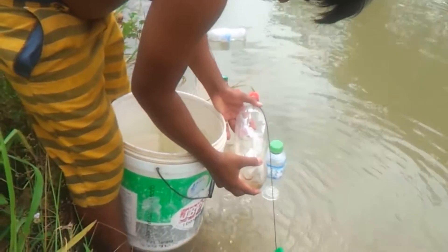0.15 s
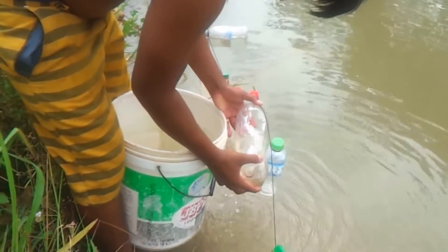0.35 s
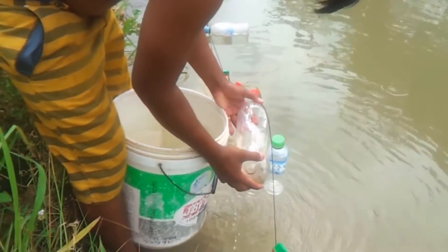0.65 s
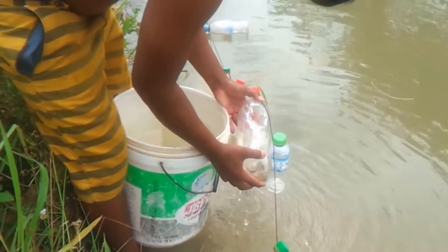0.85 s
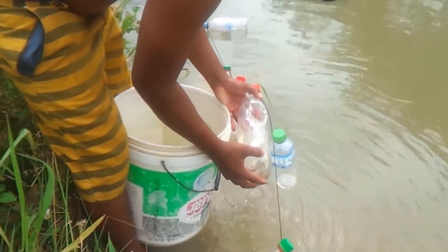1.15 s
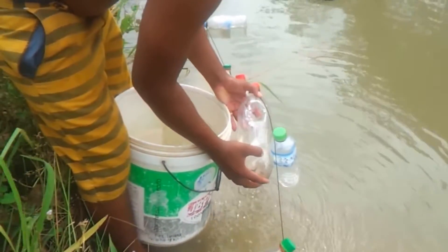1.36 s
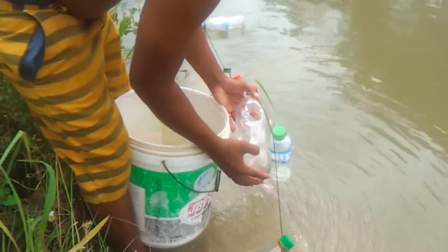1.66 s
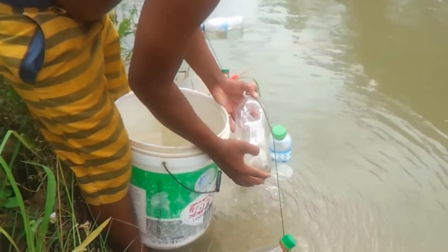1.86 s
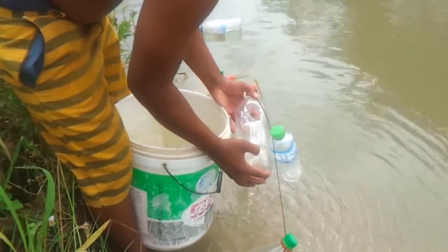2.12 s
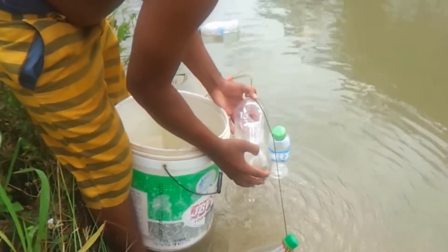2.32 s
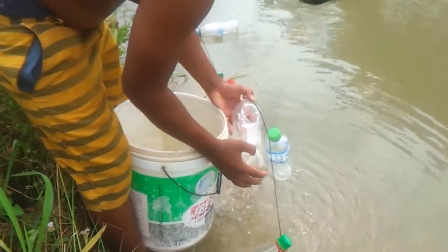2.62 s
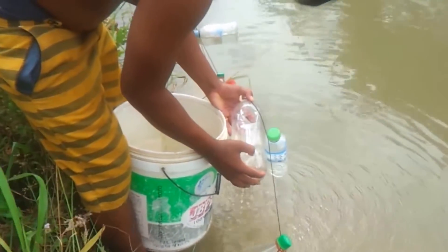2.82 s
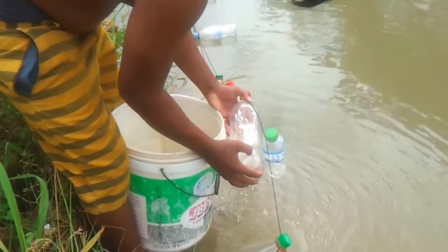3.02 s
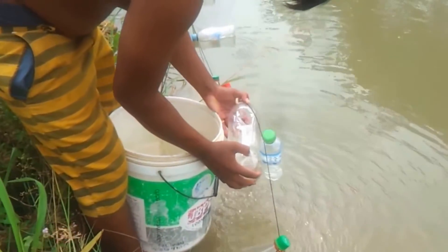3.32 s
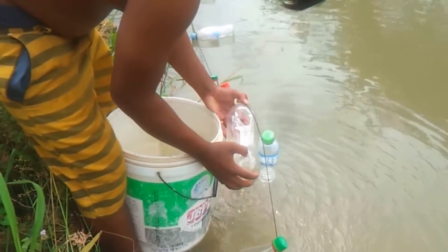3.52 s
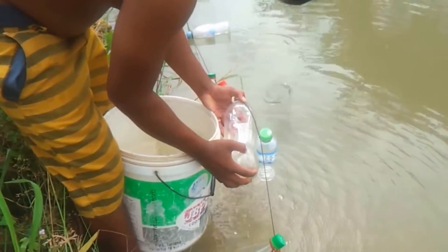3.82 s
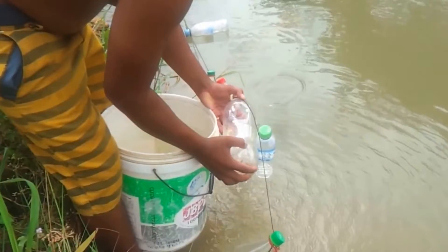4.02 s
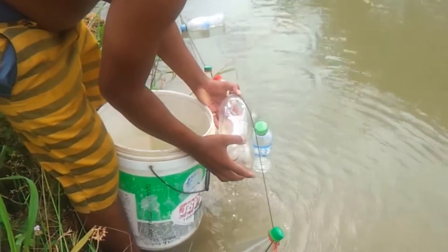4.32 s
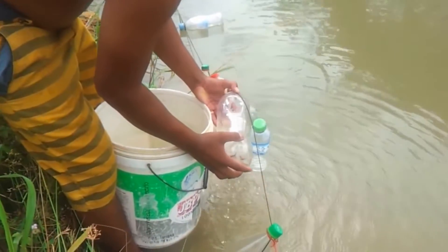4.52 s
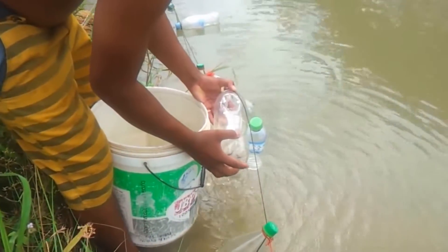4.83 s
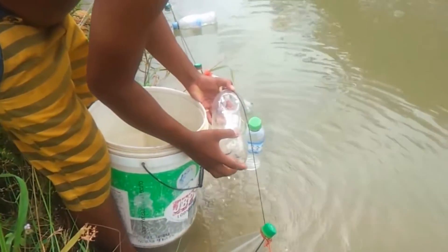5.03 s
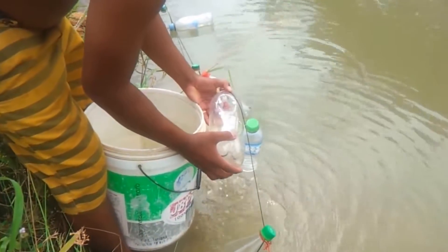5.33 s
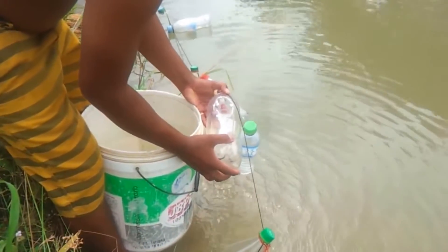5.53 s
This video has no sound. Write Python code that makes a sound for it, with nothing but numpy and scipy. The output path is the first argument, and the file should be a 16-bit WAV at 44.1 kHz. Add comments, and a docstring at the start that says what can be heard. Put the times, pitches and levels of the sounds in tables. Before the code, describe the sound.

A steady small gurgle of rising bubbles with light spray and scattered ringing drops, heard dry and near. Soft hollow plastic knocks come at about one second, more taps and rubs follow, then a bright pop of the bottle wall near 2.45 seconds. Low breeze buffets the microphone until just after three seconds, leaving quieter bubbling.

```python
"""Water trickles, gurgling and hissing, out of a plastic bottle trap held beside a bucket at a pond's edge.
The gurgle is trapped air: damped sines that climb in pitch as bubbles rise, a crowd with large ones on top.
The spray is filtered noise, a fizz of tiny splashes and single droplets ringing on the surface.
Fingers knock (damped modes), rub (filtered slips) and snap (wall modes, a short hiss) the thin plastic.
Behind them a breeze rumbles on the microphone: low noise and random thuds under slow level curves."""
import sys
import numpy as np
from scipy import signal
from scipy.io import wavfile
from scipy.ndimage import uniform_filter1d

SR = 44100
rng = np.random.default_rng(int(sys.argv[2]) if len(sys.argv) > 2 else 0)


def wav_out(sig):
    """Save sig, one row per channel (or a flat mono array), as 16-bit PCM at SR to the path in sys.argv[1]."""
    wavfile.write(sys.argv[1], SR, np.round(np.clip(np.atleast_2d(sig).T, -1, 1) * 32767).astype(np.int16))


N = 250047  # samples


def gain_of(db):
    """Logarithmic level: decibels become an amplitude factor."""
    return 10 ** (np.asarray(db) / 20)


def evened(x):
    """Normalisation: scales a signal to rms 1."""
    return x / np.sqrt(np.mean(x ** 2) + 1e-20)


def read(points, hz):
    """Spectral envelope: interpolates levels in dB along a log-frequency axis."""
    point_hz, level_db = np.transpose(points)
    return np.interp(np.log(hz + 1), np.log(point_hz + 1), level_db)


def column(rows, index):
    """Control curve: interpolates one column of a timed table at every sample."""
    rows = np.array(rows)
    return np.interp(np.arange(N) / SR, rows[:, 0], rows[:, index])


def add(mix, start_s, sound):
    """Superposition: sums a sound into the mix from start_s, cut at the end."""
    part = mix[round(start_s * SR):][:len(sound)]
    part += sound[:len(part)]


def noise(spectrum, size, patchy_db, flicker_db):
    """Shaped noise: random short-time spectra with drifting patches and a flicker shared by all bins."""
    frames, hz = 4 * N // size + 5, np.fft.rfftfreq(size, 1 / SR)
    real, imaginary, patches = rng.standard_normal((frames, len(hz), 3)).T
    patches = uniform_filter1d(patches, size=6, axis=0)  # across frequency
    patches = evened(uniform_filter1d(patches, size=8, axis=1))  # across time
    flicker = evened(uniform_filter1d(rng.standard_normal(frames), size=3))
    level_db = read(spectrum, hz)[:, None]
    bins = (real + 1j * imaginary) * gain_of(level_db + patchy_db * patches + flicker_db * flicker)
    return evened(signal.istft(bins, nperseg=size, noverlap=3 * size // 4)[1][:N])


def bubble(hz, length, rise, swell=0.064, fade_db=18):
    """Bubble resonance: trapped air rings as a decaying sine; a positive rise makes its pitch climb."""
    u = np.arange(max(round(length * SR), 32)) / SR / max(length, 32 / SR)  # share of the length
    pitch_hz = hz * (1 + rise * (u ** 1.49 - .25))
    turns = np.cumsum(pitch_hz) / SR
    onset = np.minimum(u / swell, 1) ** 1.47
    ending = np.minimum((1 - u) / 0.026, 1)
    return onset * gain_of(-fade_db * u ** 2) * ending * np.sin(2 * np.pi * turns)


def grains(shapes, per_s, spread_db):
    """Random impulse train: each shape recurs at random moments; a few grains are large."""
    size_db = spread_db * np.minimum(rng.exponential(1, N), 3)
    size = gain_of(size_db) * (rng.random(N) < per_s / SR)
    kind = rng.integers(0, len(shapes), N)
    return evened(sum(signal.oaconvolve(size * (kind == k), shape)[:N] for k, shape in enumerate(shapes)))


# breeze on the microphone: start_s [s], rumble level_db [dB], flutter relative to the rumble [dB]
BREEZE_CURVE = [(0, -48.5, -22), (.3, -43, -17), (.6, -41, -8.5), (.9, -43.5, -6.5), (1.15, -37.5, -4),
                (1.45, -41, -8), (1.75, -44.5, -6), (1.9, -37, -4.5), (2.3, -40.5, -7), (2.6, -34.5, -6),
                (3.15, -36.5, -11), (3.3, -46.5, -9), (3.9, -45.5, -8.5), (4.1, -47, -9.5),
                (5.67, -46.5, -11)]
# relative spectrum of the low rumble: frequency_hz [Hz], level_db [dB per Hz]
RUMBLE_SPECTRUM = [(20, -60), (45, -34), (65, 4), (100, 1.5), (150, -2.5), (220, -20.5), (400, -46)]
# relative spectrum of the higher flutter: frequency_hz [Hz], level_db [dB per Hz]
FLUTTER_SPECTRUM = [(100, -10.5), (190, 5), (270, 1), (400, -3.5), (600, -9), (1200, -59)]
# puffs of wind that thud on the microphone: centre_s [s], rise above the breeze [dB], length_s [s]
WIND_PUFFS = [(0.165, 5, 0.11), (0.478, 8.5, .12), (0.758, 5, 0.09), (1.246, 7.5, 0.11), (1.596, 13, 0.052),
              (2.52, 8, 0.1), (2.763, 3, 0.07), (2.897, 6.5, 0.036), (3.03, 5.5, 0.074), (3.19, 5.5, 0.089)]


def breeze():
    """Wind turbulence: low noise swells in puffs, and a flutter of short thuds swells more than the rumble."""
    t = np.arange(N) / SR
    puff_db = sum(db * np.exp(-(2.3 * (t - s) / length) ** 2) for s, db, length in WIND_PUFFS)
    rumble_db = column(BREEZE_CURVE, index=1) + puff_db
    rumble = gain_of(rumble_db) * noise(RUMBLE_SPECTRUM, size=1024, patchy_db=1.5, flicker_db=2.0)
    flutter_db = rumble_db + column(BREEZE_CURVE, index=2) + 0.42 * puff_db
    # each thud lasts a few cycles and sinks slightly in pitch
    thuds = [gain_of(read(FLUTTER_SPECTRUM, hz)) * bubble(hz, 3.44 / hz, -0.1, swell=0.37)
             for hz in np.geomspace(120, 600, num=16)]
    flutter = noise(FLUTTER_SPECTRUM, size=512, patchy_db=3.0, flicker_db=1.5)
    flutter = flutter + 0.82 * grains(thuds, per_s=70, spread_db=2.5)
    return rumble + gain_of(flutter_db - 2.5) * flutter


# a hand rubs along wet plastic; the row at 2.446 s is the short bright hiss of the snap:
# start_s [s], length_s [s], level_db [dB], bright over dull part before the dulling term [dB]
RUBS_AND_SNAP_HISS = [(1.086, 0.088, -45.5, -1), (1.219, 0.039, -35.5, -9.5), (1.301, 0.46, -48.5, -5),
                      (1.427, 0.019, -38, -8.5), (1.759, 0.35, -44.5, -7.5), (2.343, 0.2, -39, 5),
                      (2.371, 0.02, -26.5, -10), (2.382, 0.046, -24, -12), (2.446, 0.011, -28, 14),
                      (2.4715, 0.026, -32.5, 28)]
ATTACK, RELEASE = 0.17, 0.34  # shares of the length
DULLS_DB = -1  # change of the bright share over one row, dB


def rub_or_hiss(length, level_db, bright_db):
    """Friction noise: dense uneven slips in clumps, blended from a dull and a bright band; also the snap's hiss."""
    t = np.arange(0, length, 1 / SR)
    clumps_db = 3.0 * evened(uniform_filter1d(rng.standard_normal(SR), size=50))
    slips = rng.standard_normal(SR)
    slips = slips * gain_of(2.7 * np.minimum(rng.exponential(1, SR), 3) + clumps_db)
    slips = slips[:len(t)]
    dull = signal.lfilter(*signal.butter(2, [500, 4200], "band", fs=SR), slips)
    bright = signal.lfilter(*signal.butter(1, [4000, 11000], "band", fs=SR), slips)
    u = t / length
    share = gain_of(bright_db + DULLS_DB * (u - 2.5))  # a stroke dulls as it slows
    blend = (evened(dull) + evened(bright) * share) / np.sqrt(1 + share ** 2)
    envelope = np.minimum(np.minimum(u / ATTACK, (1 - u) / RELEASE), 1)
    return gain_of(level_db) * envelope * blend


# fingers knock the plastic: start_s [s], level_db before the soft press [dB], pitch_hz [Hz], t60_s [s]
FINGER_KNOCKS = [(.712, -29, 510, 0.05), (.762, -21.5, 635, 0.038), (0.959, -26.5, 320, 0.13),
                 (1.228, -23, 445, 0.043), (1.427, -13.5, 530, 0.0087), (1.571, -19.5, 194, 0.051),
                 (1.598, -28, 282, 0.03), (1.853, -20, 305, 0.01), (1.917, -7.5, 390, 0.0049),
                 (2.1719, -7, 1350, 0.0036), (2.1703, -13.5, 303, 0.0071), (2.383, -9, 990, 0.0073),
                 (2.386, -16.5, 755, 0.014), (2.3925, -14, 820, 0.017), (2.417, -12.5, 453, 0.0099),
                 (2.4498, -16.5, 270, 0.037), (2.4522, -11, 620, 0.018)]


def knocks():
    """Damped vibration: each knock swings the wall in a main mode and a weaker upper one."""
    out, t = np.zeros(N), np.arange(4000) / SR
    for start_s, level_db, hz, t60 in FINGER_KNOCKS:
        swing = np.sin(2 * np.pi * hz * t) + 0.51 * np.sin(2 * np.pi * 1.307 * hz * t)
        decaying = gain_of(level_db - 60 * t / t60) * swing
        press = signal.windows.hann(max(round(.6 * SR / hz), 3))  # a fingertip presses in gradually
        add(out, start_s, np.convolve(decaying, press / press.sum()))
    return out


# modes of the bottle wall as it snaps: pitch_hz [Hz], width_hz [Hz], relative level_db [dB]
WALL_MODES = [(1500, 790, -29), (2060, 700, -1.5), (4400, 630, 0.5), (5900, 670, -1.5), (6900, 2000, -5),
              (8900, 620, -6), (11000, 1000, 0), (12000, 800, -6)]
SNAP_S, SNAP_DB = 2.4503, -3  # start in s, gain on all modes in dB


def snap():
    """Modal excitation: the dented wall pops back and rings its short modes at once."""
    t = np.arange(600) / SR
    ring = sum(gain_of(db) * np.exp(-np.pi * width * t) * np.sin(2 * np.pi * hz * t)
               for hz, width, db in WALL_MODES)
    return gain_of(SNAP_DB) * np.minimum(t / 0.000089, 1) * ring


# the stream, setting both spray and gurgle: start_s [s], gurgle level_db [dB], spray level_db [dB]
STREAM_CURVE = [(0.0, -51.5, -50), (0.11, -46.5, -50.5), (0.65, -45, -50), (0.98, -45.5, -47.5),
                (1.18, -42.5, -48), (1.83, -49.5, -49), (2.07, -39.5, -47.5), (2.35, -41, -48.5),
                (2.59, -43, -51.5), (3.11, -42, -52), (3.82, -52, -52.5), (4.14, -50, -54.5),
                (4.28, -49, -51), (4.44, -46, -52), (4.64, -46.5, -52), (4.83, -49.5, -53.5),
                (5.1, -43.5, -53), (5.67, -47, -52.5)]
# relative spectrum of the spray: frequency_hz [Hz], level_db [dB per Hz]
SPRAY_SPECTRUM = [(300, -5.5), (1000, 5.5), (1600, -7), (2300, -8), (3200, -12.5), (4400, -10),
                  (5400, -11.5), (6500, -11.5), (7700, -15), (9000, -12.5), (10700, -14.5), (13900, -13.5)]
# droplets on the surface: start_s [s], ring level_db [dB], onset pitch_hz [Hz]
DROPLETS = [(0.049, -33, 3860), (0.0892, -40, 2080), (.201, -27.5, 4400), (.366, -29.5, 6900),
            (0.384, -36, 4420), (0.49, -35, 1980), (0.492, -31.5, 7300), (0.6755, -28.5, 4070),
            (.843, -43, 2250), (0.9195, -39, 3700), (.9912, -37, 3860), (1.1039, -30, 3600),
            (1.105, -24.5, 6570), (1.1432, -23.5, 8140), (1.355, -37, 2260), (1.754, -29, 2230),
            (1.793, -31, 4800), (1.821, -32, 2460), (1.902, -31, 5230), (1.925, -31, 6460),
            (1.957, -36, 3240), (2.076, -24.5, 6270), (2.1194, -32, 2300), (2.1902, -27, 6600),
            (2.3407, -20, 4580), (2.552, -27.5, 5100), (2.73, -35, 3500), (2.9854, -39, 5100),
            (3.1667, -41, 4540), (3.772, -38, 3830), (3.837, -36.5, 3330), (4.3114, -31.5, 3340),
            (4.318, -36, 4070), (4.4117, -28.5, 4730), (4.4544, -35, 5300), (4.507, -39, 4700),
            (4.56, -45, 3700), (4.5913, -36, 2330), (4.686, -41, 5900), (4.741, -40, 3180),
            (4.816, -36, 4630), (5.084, -37.5, 1910), (5.2754, -42, 3750), (5.4272, -33.5, 4440),
            (5.523, -34.5, 3140), (5.555, -40, 4830)]
SPLASH_DB = -45.5  # every droplet lands with a puff of about this starting level


def spray():
    """Droplet impact: fine hiss, a fizz of tiny rattling splashes, and single ringing droplets."""
    pitches = np.geomspace(1900, 12000, num=30)
    fades_db = rng.uniform(.08, .4, 30)  # dB per sample
    rattles = rng.standard_normal((30, 300))
    shapes = []
    for hz, fade_db, rattle in zip(pitches, fades_db, rattles):
        shape = np.convolve(bubble(hz, 6.1 / hz, 0.14), gain_of(-np.arange(300) * fade_db) * rattle)
        shapes.append(shape * gain_of(read(SPRAY_SPECTRUM, hz)) / np.linalg.norm(shape))
    fizz = grains(shapes, per_s=250, spread_db=6.5)
    hiss = noise(SPRAY_SPECTRUM, size=256, patchy_db=2.5, flicker_db=1.25)
    out = gain_of(column(STREAM_CURVE, index=2)) * (gain_of(5.5) * hiss + gain_of(-7.5) * fizz)
    t = np.arange(2500) / SR
    puffs = rng.standard_normal((len(DROPLETS), 2500))
    for (start_s, level_db, hz), puff in zip(DROPLETS, puffs):
        turns = hz * t * (1 + 4 * t)
        shaken_phase = 2 * np.pi * turns + 0.044 * np.cumsum(puff)
        ring = gain_of(-1.3 * turns) * np.sin(shaken_phase)  # loses the same share each cycle
        splash = gain_of(SPLASH_DB - 60 * t / 0.017) * np.diff(puff, prepend=0)
        add(out, start_s, np.minimum(t / 0.00023, 1) * (gain_of(level_db) * ring + splash))
    return out


# relative spectrum of the gurgle: frequency_hz [Hz], level_db [dB]
GURGLE_SPECTRUM = [(300, -34), (550, -22), (720, -11), (900, 4), (1100, -3.5), (1450, -3.5), (2000, -19),
                   (2800, -42), (5000, -42)]
# large bubbles, and at 0.958 s (rows 0.9583 and 0.9647) the hollow beating ring of a knock on the bottle:
# start_s [s], level_db before the shaking [dB], pitch_hz a quarter of the way up its rise [Hz],
# length_s [s], pitch rise over the length [share of pitch_hz]
BUBBLES_AND_KNOCK_RING = [(0.029, -29, 812, 0.057, 0.22), (0.087, -24, 877, 0.017, 0.52),
                          (0.245, -28, 1070, 0.012, 1), (0.3, -31, 868, 0.031, 0.063),
                          (0.439, -30.5, 942, 0.045, 0.26), (.517, -25.5, 1026, 0.016, 0.18),
                          (0.525, -34.5, 1500, 0.014, 0.72), (0.585, -27, 983, 0.018, .15),
                          (0.646, -31.5, 810, 0.029, .23), (0.876, -30.5, 1057, 0.026, 0.21),
                          (0.9583, -13.5, 683, 0.0068, 0.08), (0.9647, -22, 633, 0.013, 0.13),
                          (1.025, -32, 910, 0.019, 0.12), (1.042, -31, 917, 0.03, .12),
                          (1.119, -31.5, 956, 0.024, 0.18), (1.498, -28.5, 980, 0.017, 0.41),
                          (1.6, -30.5, 1343, 0.015, 0.14), (1.804, -33, 1234, 0.023, 0.82),
                          (2.021, -31, 880, 0.011, 0.24), (2.091, -29, 813, 0.035, 0.14),
                          (2.614, -26, 883, 0.024, 0.12), (2.649, -28.5, 940, 0.018, 0.21),
                          (2.704, -26.5, 891, 0.029, 0.67), (2.901, -27, 861, 0.034, 0.97),
                          (2.963, -29.5, 990, .02, 0.17), (3.014, -34.5, 852, 0.019, 0.22),
                          (3.076, -32, 996, 0.022, 0.18), (3.243, -34.5, 910, 0.05, 0.23),
                          (3.377, -36.5, 863, 0.024, .2), (3.44, -27, 848, 0.025, 0.28),
                          (3.633, -28, 966, 0.02, 0.24), (3.659, -32.5, 1370, 0.015, .37),
                          (3.825, -38, 940, 0.044, 0.12), (3.867, -34.5, 978, 0.041, 0.24),
                          (4.057, -34.5, 942, 0.051, 0.26), (4.096, -36.5, 1374, 0.031, 0.16),
                          (4.199, -23.5, 1018, 0.014, 0.33), (4.22, -32.5, 965, 0.035, 0.08),
                          (4.3, -36.5, 761, 0.053, 0.85), (4.342, -36, 1220, 0.033, 0.89),
                          (4.39, -25.5, 858, 0.016, 0.28), (4.411, -35, 930, 0.017, 0.18),
                          (4.434, -34, 900, 0.016, .16), (4.452, -30.5, 990, 0.021, 0.15),
                          (4.471, -32, 950, 0.016, .3), (4.557, -33.5, 772, 0.033, 0.3),
                          (4.867, -33.5, 806, 0.022, .2), (4.963, -32.5, 900, 0.02, 0.29),
                          (5.001, -31, 918, 0.025, .23), (5.104, -30.5, 850, 0.018, 0.16),
                          (5.148, -31, 885, 0.028, 0.19), (5.209, -32, 1580, 0.0072, 0.45),
                          (5.224, -33, 905, 0.0085, .13), (5.243, -35, 1250, .015, 0.34),
                          (5.325, -25, 905, 0.012, 0.17), (5.357, -33.5, 1450, .012, 0.77),
                          (5.371, -28.5, 814, 0.014, 0.35), (5.387, -28, 887, 0.011, 0.62),
                          (5.476, -31.5, 863, 0.019, 0.15), (5.531, -25.5, 920, 0.015, 0.25)]


def gurgle():
    """Bubble acoustics: a crowd of small rising bubbles, with large ones and one hollow knock ring on top."""
    pitches, luck = np.geomspace(600, 2700, num=48), rng.random((48, 2))
    shapes = []
    for hz, (long, steep) in zip(pitches, luck):
        ring = bubble(hz, (6 + 11 * long ** 2) / hz, 0.039 + 0.34 * steep ** 2, swell=0.18)
        shapes.append(gain_of(read(GURGLE_SPECTRUM, hz)) * ring)
    crowd = grains(shapes, per_s=320, spread_db=2.0)
    crowd = crowd + gain_of(-9.5) * noise(GURGLE_SPECTRUM, size=512, patchy_db=0.0, flicker_db=1.5)
    stream = gain_of(column(STREAM_CURVE, index=1)) * crowd
    # churning water shakes the level of each ring
    shake = gain_of(1.3 * evened(uniform_filter1d(rng.standard_normal(N), size=180)))
    rings = np.zeros(N)
    for start_s, level_db, hz, length, rise in BUBBLES_AND_KNOCK_RING:
        add(rings, start_s, gain_of(level_db) * bubble(hz, length, rise, swell=0.24))
    return stream + rings * shake


def scene():
    """Direct sound only: every source sums, without reflections, at one close microphone."""
    hands = knocks()
    add(hands, SNAP_S, snap())
    for start_s, length, level_db, bright_db in RUBS_AND_SNAP_HISS:
        add(hands, start_s, rub_or_hiss(length, level_db, bright_db))
    return (breeze() + gurgle() + spray() + hands)[None]


def record(dry):
    """Band limiting: the microphone cuts the deepest bass, then a steep filter removes the top."""
    thin = signal.sosfilt(signal.butter(4, 50, "high", fs=SR, output="sos"), dry)
    low_pass = signal.firwin(511, 14650, window=("kaiser", 9), fs=SR)  # cutoff in Hz
    return signal.oaconvolve(thin, low_pass[None], "same")


dry = scene()
out = record(dry)
wav_out(out)
```